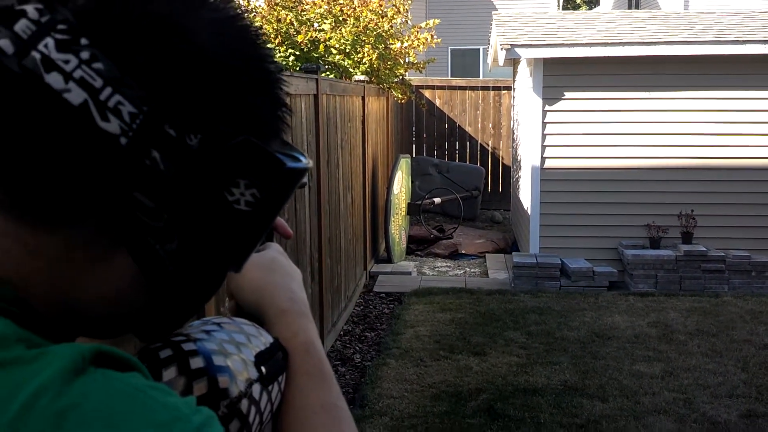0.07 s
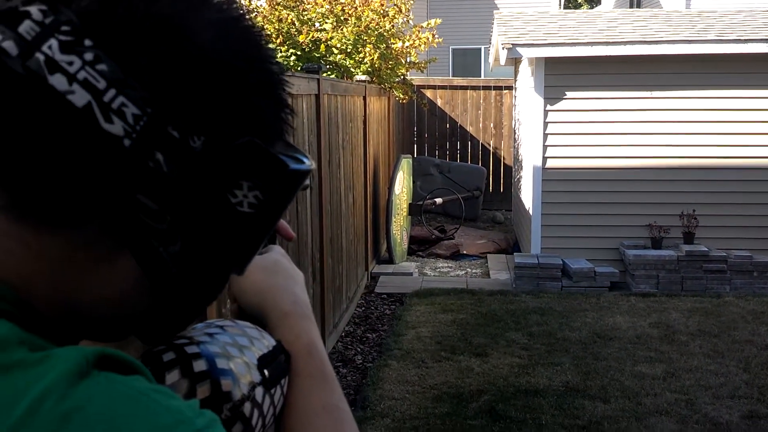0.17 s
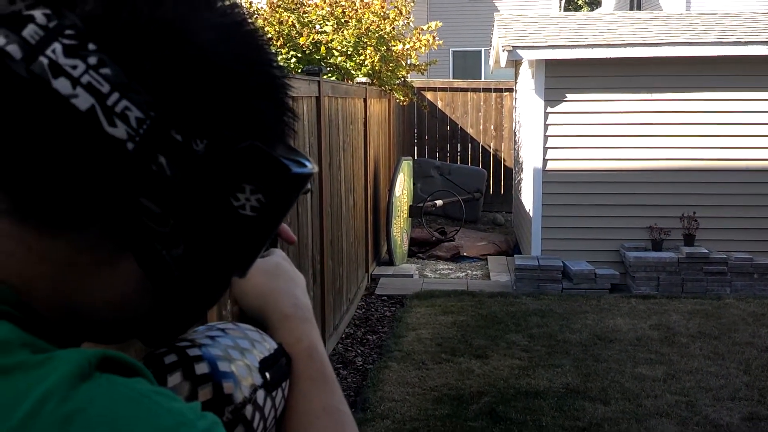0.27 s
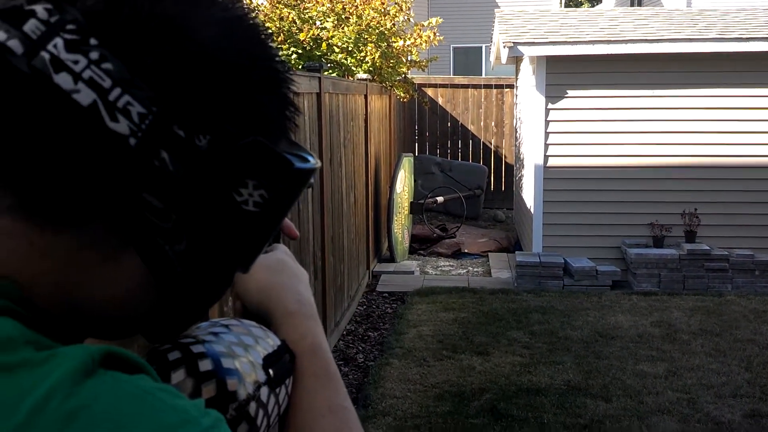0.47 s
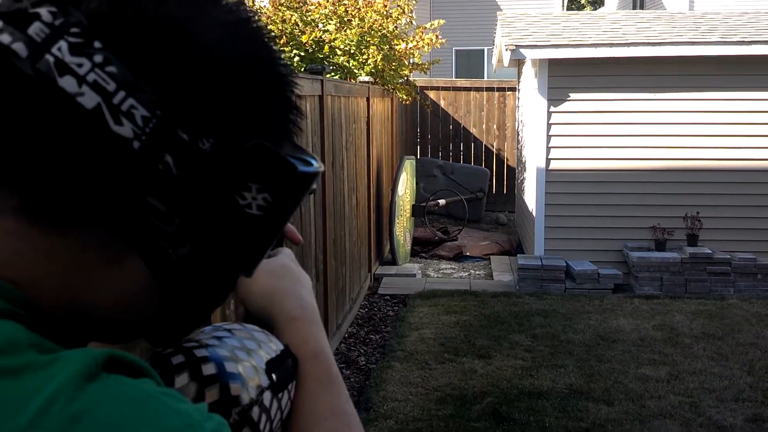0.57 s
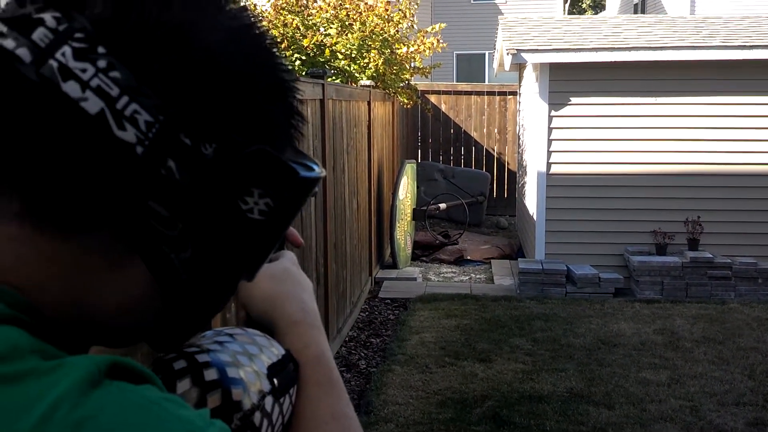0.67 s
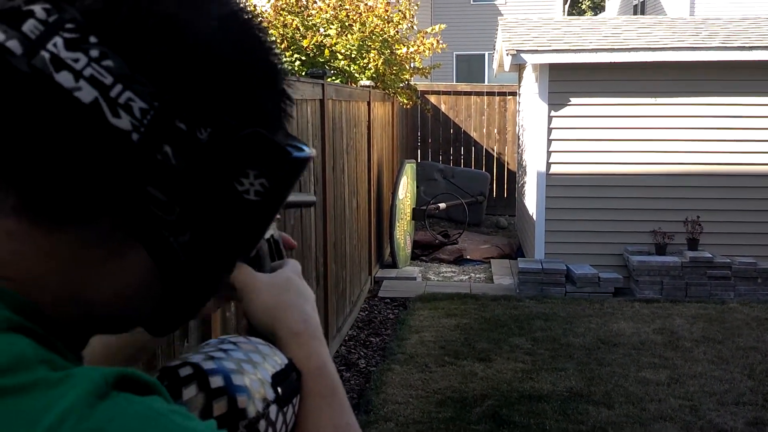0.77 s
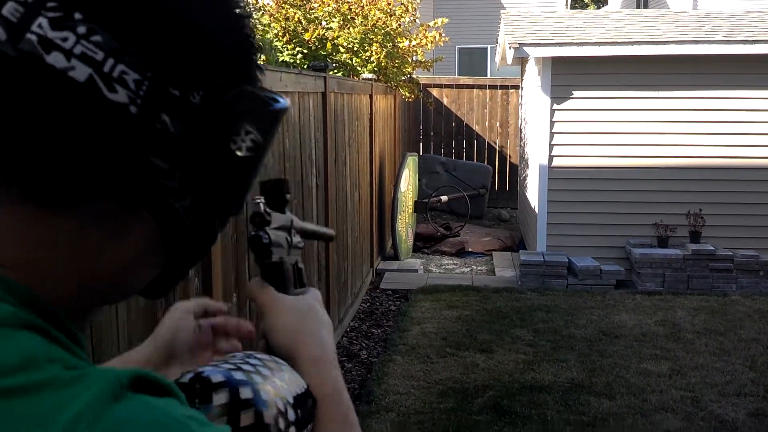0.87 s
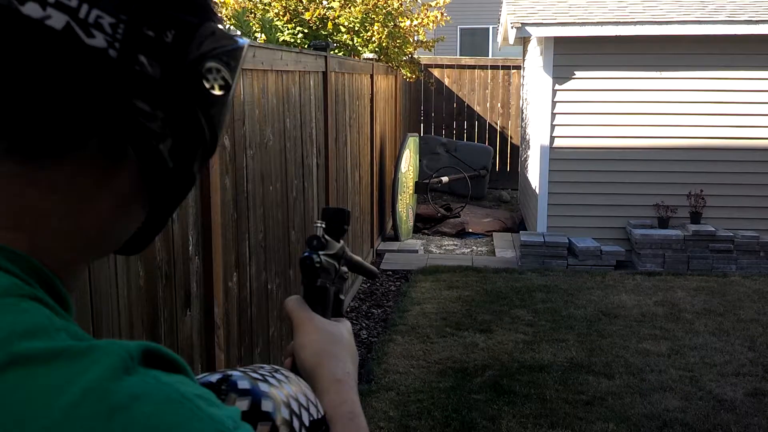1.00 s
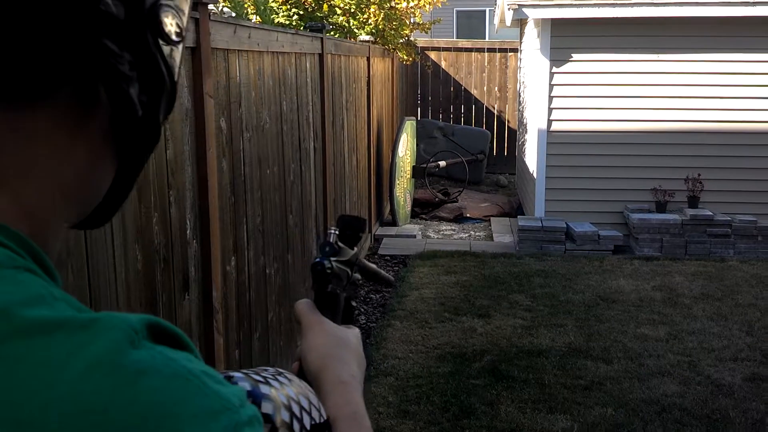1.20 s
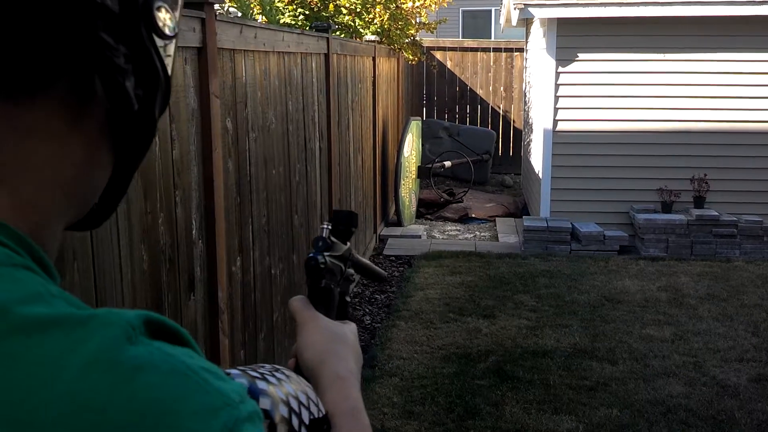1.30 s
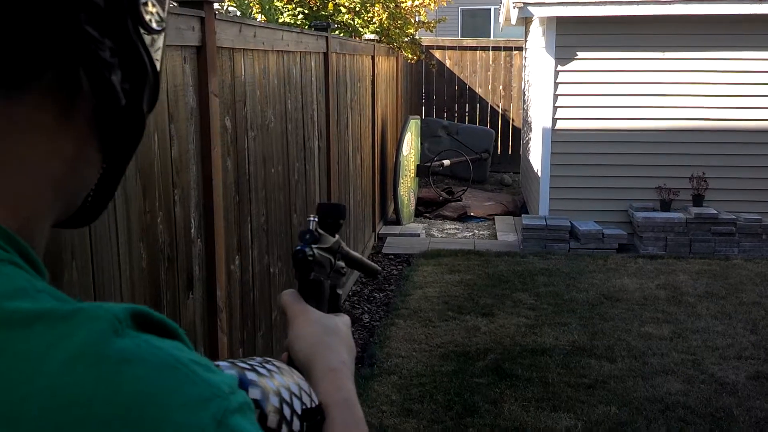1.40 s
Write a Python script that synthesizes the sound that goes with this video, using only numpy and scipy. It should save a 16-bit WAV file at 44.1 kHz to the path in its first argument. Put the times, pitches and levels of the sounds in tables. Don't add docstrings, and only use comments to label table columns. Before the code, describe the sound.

Single paintball shot cracks with a gas burst outdoors, followed quickly by a ringing hollow impact

```python
import sys
import numpy as np
from scipy import signal
from scipy.fft import rfft, irfft, next_fast_len
from scipy.io import wavfile

SR = 44100
rng = np.random.default_rng(int(sys.argv[2]) if len(sys.argv) > 2 else 0)


def voltage_ratio(level):
    return 10 ** (np.asarray(level, float) / 20)


def digitize_waveform(pressure):
    field = np.atleast_2d(pressure).T
    bounded = np.clip(field, -1, 1)
    quanta = np.round(bounded * 32767).astype(np.int16)
    wavfile.write(sys.argv[1], SR, quanta)


N = 63945
T = np.arange(N) / SR


def in_time(rows):
    return np.interp(T, *np.transpose(rows))


def at_hz(points, hz):
    freq_hz, value = np.array(points).T
    return np.interp(np.log(hz), np.log(freq_hz), value)


def drift(rate_hz):
    r = np.exp(-2 * np.pi * rate_hz / SR)
    slow = signal.lfilter([1], [1, -2 * r, r * r], rng.standard_normal(N + SR))[SR:]
    return slow / slow.std()


def bandpass(x, low_hz, high_hz):
    sos = signal.butter(2, [low_hz, high_hz], "band", fs=SR, output="sos")
    return signal.sosfilt(sos, x)


def fall(start_s, t60_s, hold_s=0.):
    falling_s = np.maximum(T - start_s - hold_s, 0)
    return (T >= start_s) * voltage_ratio(-60 * falling_s / max(t60_s, 1e-3))


def ring(x, hz, t60_s):
    r = voltage_ratio(-60 / (t60_s * SR))
    w = 2 * np.pi * hz / SR
    return signal.lfilter([0, np.sin(w)], [1, -2 * r * np.cos(w), r * r], x + 1e-18)


def struck(hit_s, modes):
    strike = np.zeros(N)
    strike[int(hit_s * SR)] = 1
    return sum((-1) ** k * voltage_ratio(db) * ring(strike, hz, t60_s) for k, (hz, db, t60_s) in enumerate(modes))


def fronts(rows, lag_s):
    out = np.zeros((2, N))
    for start_s, db, length_s in rows:
        phase = (T - start_s - np.array([[0], [lag_s]])) / length_s
        inside = (phase > 0) & (phase < 1)
        out += voltage_ratio(db) * np.where(inside, np.sin(2 * np.pi * phase), 0)
    return out


# freq_hz, correlation (-1..1)
PORT_LIKENESS = [(200, 1), (600, 0.77), (1200, 0.33), (2000, 0.19), (16000, 0.)]


def scattered(colour, envelope, grain):
    edges_hz = 50 * 2 ** np.arange(0, 8.6, .5)
    grains = voltage_ratio(grain * np.minimum(rng.exponential(1, N), 4))
    white = rng.standard_normal((2, 2, N)) * grains
    white = white / white.std()
    out, power = 0, 0
    for k, (low, high) in enumerate(zip(edges_hz, edges_hz[1:])):
        hz = np.sqrt(low * high)
        mid, side = bandpass(white[k % 2] * (envelope(hz) + 1e-12), low, high)
        alike = np.clip(at_hz(PORT_LIKENESS, hz), -1, 1)
        gain = voltage_ratio(at_hz(colour, hz))
        out = out + gain * (np.sqrt(1 + alike) * mid + np.sqrt(1 - alike) * side * [[1], [-1]])
        power += gain ** 2 * 4 * (high - low) / SR
    return out / np.sqrt(power)


# time_s, level_db
AIR_LEVEL = [(0, -60.5), (.15, -59.5), (.3, -60), (.5, -66), (.7, -59), (.9, -61), (1.2, -64),
             (1.36, -64.5), (1.45, -62.5)]
# freq_hz, level_db
AIR_SPECTRUM = [(55, -4.5), (100, 12), (170, 5.5), (300, 6), (600, -7.5), (1900, -11.5), (4000, -31.5),
                (9000, -59)]


def air():
    return voltage_ratio(in_time(AIR_LEVEL) + 2.8 * drift(2.7)) * scattered(AIR_SPECTRUM, lambda hz: 1, grain=0)


# start_s, peak_db, start_hz, left_share (0-1)
WIND_LUMPS = [(.001, -34, 140, .1), (.013, -33, 210, .1), (.058, -33, 150, .3), (.072, -36, 150, .3),
              (.096, -37, 150, .2), (.181, -40, 150, .2), (.195, -34, 170, .15), (.2060, -23, 300, 0.),
              (.2140, -27, 160, 0.), (.2670, -25, 200, .05), (.282, -31, 170, .15), (.302, -37, 140, .2),
              (.320, -44, 140, .3), (.362, -28, 150, .4), (1.056, -54, 115, .4), (1.165, -54, 115, .4)]
LUMP_T60_S, LUMP_SAG_PER_S, LUMP_RISE_S = .036, 40, .0018
# time_s, level_db
WIND_LEVEL = [(0, -60), (.1, -61), (.16, -62), (.2, -60), (.245, -70), (.28, -61), (.33, -64), (.42, -72),
              (.55, -76), (.65, -68), (.8, -69), (1.0, -73), (1.2, -76), (1.45, -72)]
WIND_LOW_HZ, WIND_HIGH_HZ = 70, 205


def wind():
    out = np.zeros((2, N))
    for start_s, db, hz, left_share in WIND_LUMPS:
        t = np.maximum(T - start_s, 0)
        swell = fall(start_s, LUMP_T60_S) * (1 - np.exp(-t / LUMP_RISE_S))
        sagging = np.sin(2 * np.pi * hz * np.log1p(LUMP_SAG_PER_S * t) / LUMP_SAG_PER_S)
        out += -voltage_ratio(db + 2.5) * swell * sagging * [[left_share], [left_share - 1]]
    rumble = bandpass(rng.standard_normal((2, N)), WIND_LOW_HZ, WIND_HIGH_HZ)
    return out + voltage_ratio(in_time(WIND_LEVEL) + 2.5 * drift(25)) * rumble / rumble.std()


# start_s, peak_db, knock_db
CONTACTS = [(.111, -69.5, -95), (0.3308, -61, -66.5), (.3357, -27.5, -35.5), (.3379, -24.5, -48),
            (.3548, -28, -37.5), (.3570, -26, -31), (.3590, -24, -40.5), (.3620, -33, -41.5),
            (.4200, -36.5, -60), (0.561, -69, -55.5), (.5660, -78, -40), (0.569, -25, -38),
            (.5706, -24, -35), (0.799, -62.5, -92), (1.156, -66.5, -76)]
# freq_hz, level_db
CRACK_SPECTRUM = [(700, -11), (1800, -2.5), (3200, -7), (5800, -10.5), (8000, -4.5), (11000, -18.5),
                  (15000, -16)]
CRACK_T60_S, TAIL_DB, TAIL_T60_S = 0.0069, -25, 0.095
KNOCK_HZ, KNOCK_T60_S = 936, .015


def ticks():
    crack, knock = np.zeros(N), np.zeros(N)
    for start_s, peak_db, knock_db in CONTACTS:
        tail = voltage_ratio(TAIL_DB) * fall(start_s, TAIL_T60_S)
        crack += voltage_ratio(peak_db) * (fall(start_s, CRACK_T60_S) + tail)
        knock[int(start_s * SR)] = voltage_ratio(knock_db)
    return scattered(CRACK_SPECTRUM, lambda hz: crack, grain=0.67) + ring(knock, KNOCK_HZ, KNOCK_T60_S)


# start_s, peak_db, length_s
MUZZLE_FRONTS = [(.3548, -20, 0.00081), (.3571, -21.5, 0.0019), (.3623, -20, 0.0011),
                 (.3688, -22.5, 0.0025), (.4200, -39, 0.0015)]
# freq_hz, level_db
GAS_SPECTRUM = [(80, -28.5), (170, -4.5), (350, 10), (950, -7.5), (1900, -1), (4000, -12), (8000, -11),
                (15000, -16.5)]
# freq_hz, t60_s
GAS_T60 = [(100, .08), (1000, 0.037), (15000, 0.027)]
# freq_hz, t60_s
YARD_DECAY = [(100, .14), (700, .24), (2500, .25), (8000, .22), (13000, .15)]
# freq_hz, level_db, t60_s
BARREL_MODES = [(165, -33.5, 0.17), (288, -37, 0.03), (340, -35.5, 0.04), (583, -31.5, 0.11),
                (701, -39.5, 0.037), (938, -34, 0.1), (1456, -32, .06), (1840, -33, 0.16)]
BLAST_S, BLAST_DB, BLAST_HOLD_S, BLAST_LATE_DB = .3543, -26.5, .014, -2.5


def blast():
    def envelope(hz):
        jet = fall(BLAST_S, at_hz(GAS_T60, hz), BLAST_HOLD_S)
        return jet + voltage_ratio(BLAST_LATE_DB) * fall(BLAST_S, at_hz(YARD_DECAY, hz))

    gas = voltage_ratio(BLAST_DB) * scattered(GAS_SPECTRUM, envelope, grain=2.5)
    return gas + fronts(MUZZLE_FRONTS, lag_s=.00005) + struck(BLAST_S, BARREL_MODES)


# start_s, peak_db, length_s
BURST_FRONTS = [(.5692, -20, .0005), (.5728, -19, .0008), (.5805, -25, .0008), (.5853, -23, .0009),
                (.5893, -24, .0010), (.5990, -28, .0011)]
# freq_hz, level_db
BURST_SPECTRUM = [(70, -15.5), (180, -2.5), (400, 0), (850, -16), (1900, -2.5), (3300, -14.5), (8000, -24),
                  (15000, -31)]
# freq_hz, t60_s
BURST_T60 = [(100, 0.45), (1000, 0.15), (4000, 0.017), (15000, 0.07)]
# freq_hz, t60_s
BURST_YARD_T60 = [(100, 0.2), (700, 0.66), (2500, 0.43), (12000, 0.31)]
# freq_hz, level_db, t60_s
TARGET_MODES = [(187, -37, 0.081), (284.6, -39, .25), (491, -44, 0.25), (589, -36, 0.24),
                (697, -38.5, 0.26), (881, -33, 0.12), (1090, -55.5, .08), (1520, -40, 0.066),
                (1783, -32.5, 0.13)]
# freq_hz, level_db, t60_s
DRUM_MODES = [(363, -36, .45), (369.5, -39, .75)]
HIT_S, HIT_DB, HIT_HOLD_S, HIT_LATE_DB = .5690, -24.5, 0.0022, -11.5


def hit():
    def envelope(hz):
        burst = fall(HIT_S, at_hz(BURST_T60, hz), HIT_HOLD_S)
        return burst + voltage_ratio(HIT_LATE_DB) * fall(HIT_S, at_hz(BURST_YARD_T60, hz))

    crack = voltage_ratio(HIT_DB) * scattered(BURST_SPECTRUM, envelope, grain=3.4)
    target = struck(HIT_S, TARGET_MODES) + struck(HIT_S, DRUM_MODES)
    return crack + fronts(BURST_FRONTS, lag_s=.00009) + target


# time_s, level_db
CLOTH_LEVEL = [
    (.9, -100),
    (.96, -84),
    (1.05, -85.5),
    (1.14, -92),
    (1.2, -100),
]


def cloth():
    colour = [(3000, -30), (6000, -6.5), (8000, 1.5), (12000, -23.5)]  # freq_hz, level_db
    return voltage_ratio(in_time(CLOTH_LEVEL)) * scattered(colour, lambda hz: 1, grain=1.5)


def scene():
    return air() + wind() + ticks() + blast() + hit() + cloth()


def peak(hz, centre_hz, width_hz, db):
    return 1 + (voltage_ratio(db) - 1) / (1 + 1j * (hz ** 2 - centre_hz ** 2) / np.maximum(hz * width_hz, 1))


def roll_off(x):
    return signal.sosfilt(signal.butter(12, 16640, fs=SR, output="sos"), x)


# centre_hz, width_hz, level_db
LEFT_PORT, RIGHT_PORT = (7800, 1200, 15), (5600, 1000, 5)
CASE, CASE_DIPS = (900, 300, 4), [(560, 200, -5), (1300, 250, -4)]
HISS_DB, HISS_TILT, HISS_TOP_HZ = -75.5, 0.26, 15500
CROSS_SHARE, CROSS_LAG_SAMPLES, CROSS_LOW_HZ, CROSS_CUT_HZ = .98, 18, 31, 4900
LOW_CUT_HZ, LOW_CUT_Q, TOP_HZ = 90, 2.21, 16000
DUCK_S, DUCK_DB, DUCK_ATTACK_S = 0.3335, 15, 0.005
CEILING = .62


def record(dry):
    size = next_fast_len(N + 2048)
    hz = np.arange(size // 2 + 1) * SR / size
    ports = np.array([peak(hz, *LEFT_PORT), peak(hz, *RIGHT_PORT)])
    for resonance in [CASE, *CASE_DIPS]:
        ports = ports * peak(hz, *resonance)
    hiss = voltage_ratio(HISS_DB) * signal.lfilter([1, -HISS_TILT], [1], rng.standard_normal((2, N)))
    both = rfft(dry, size) * ports + rfft(hiss, size) * (hz < HISS_TOP_HZ)

    delay = np.exp(-2j * np.pi * hz * CROSS_LAG_SAMPLES / SR)
    cross = CROSS_SHARE * delay / np.sqrt(1 + (hz / CROSS_CUT_HZ) ** 8)
    cross = cross * hz / np.sqrt(hz ** 2 + CROSS_LOW_HZ ** 2)
    jw = 1j * hz / LOW_CUT_HZ
    low_cut = jw ** 2 / (1 + jw / LOW_CUT_Q + jw ** 2)
    top_cut = 1 / (1 + (hz / TOP_HZ) ** 80)
    wide = irfft((both - cross * both[::-1]) * low_cut * top_cut, size)[:, :N]

    gain_db = DUCK_DB * np.exp(-np.maximum(T - DUCK_S, 0) / DUCK_ATTACK_S)
    mix = CEILING * np.tanh(wide * voltage_ratio(gain_db) / CEILING)
    return roll_off(mix)


dry = scene()
out = record(dry)
digitize_waveform(out)
```